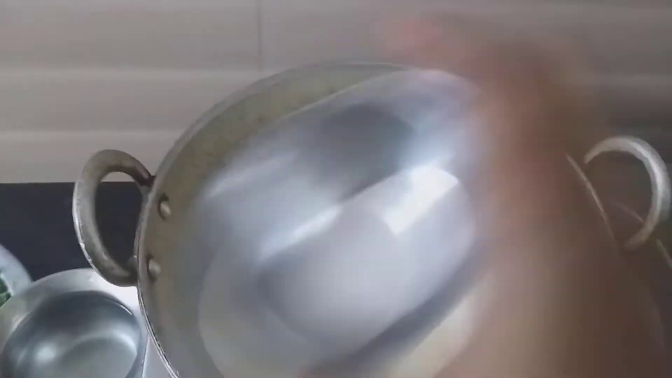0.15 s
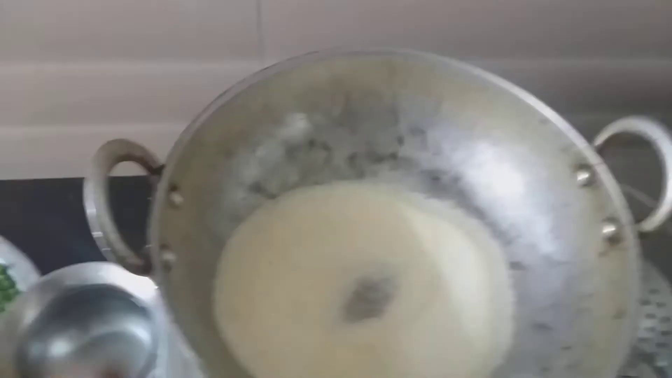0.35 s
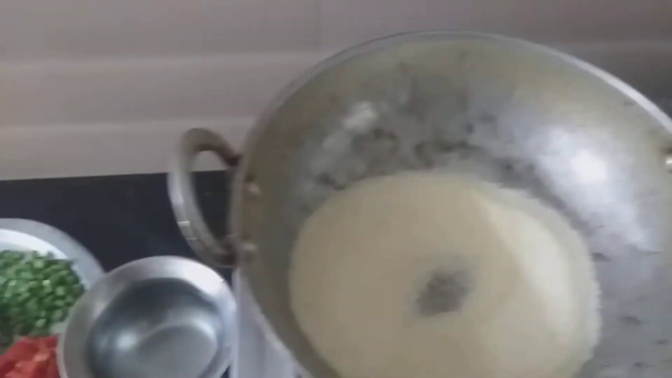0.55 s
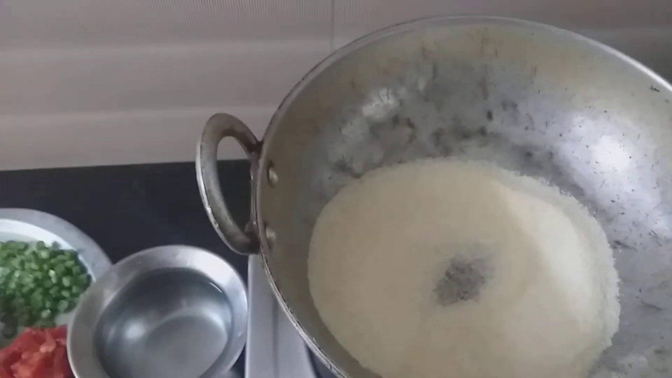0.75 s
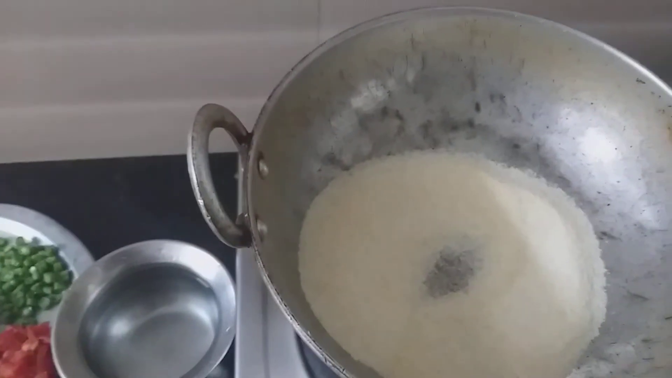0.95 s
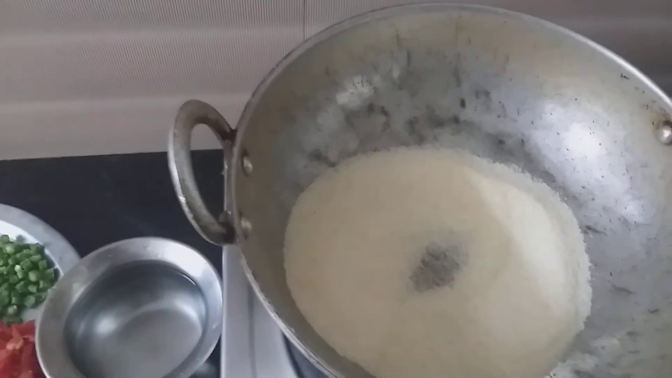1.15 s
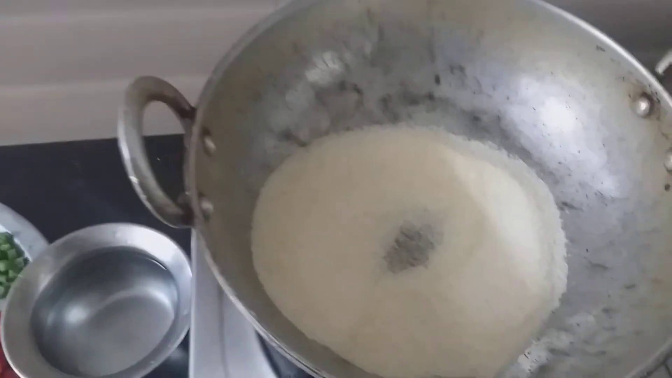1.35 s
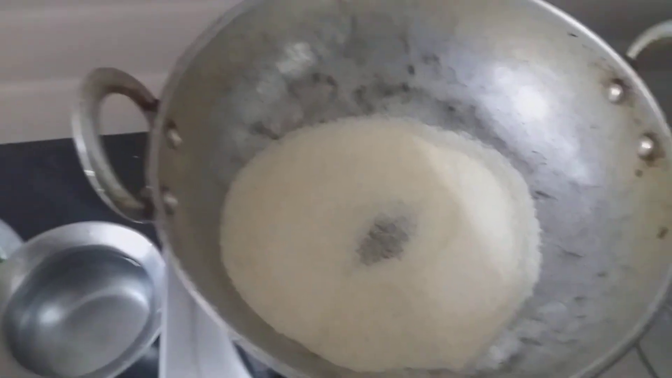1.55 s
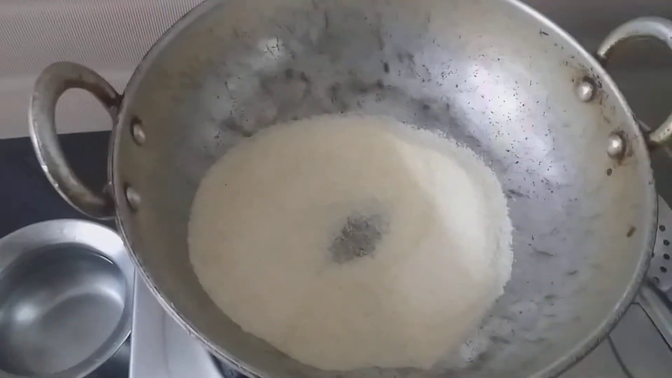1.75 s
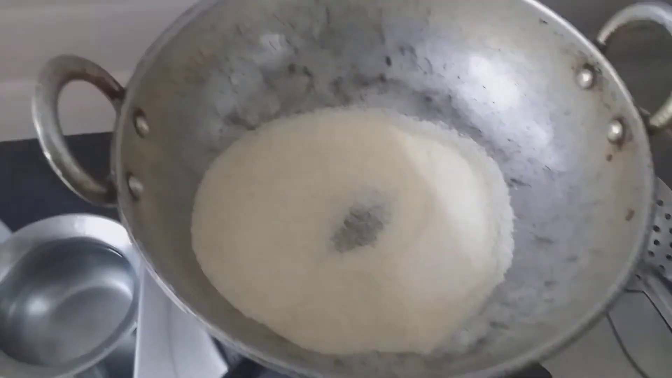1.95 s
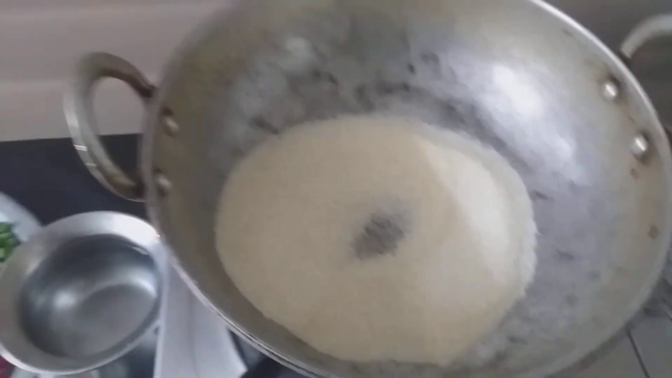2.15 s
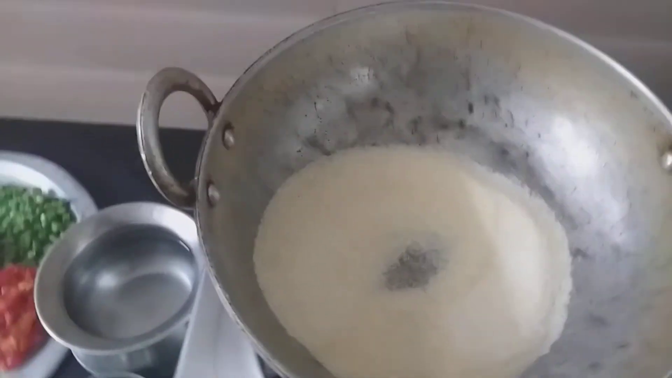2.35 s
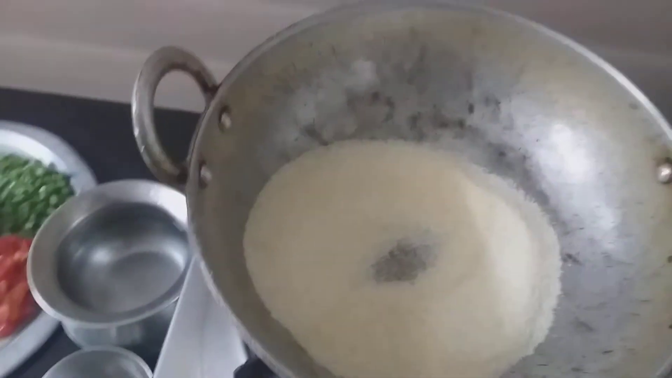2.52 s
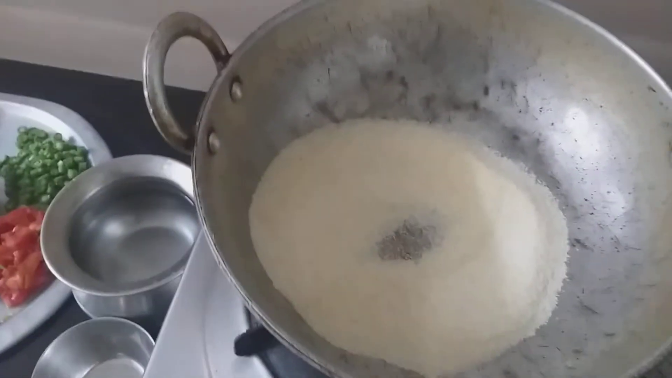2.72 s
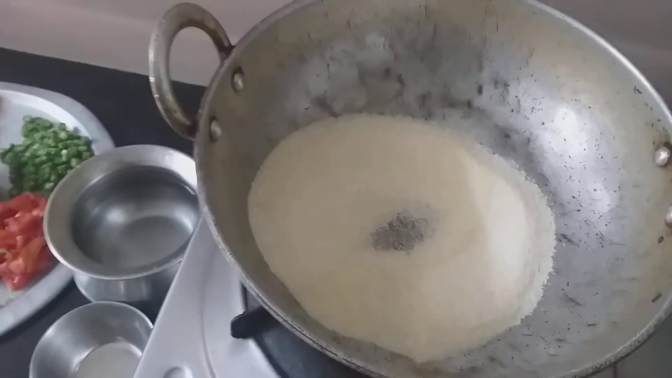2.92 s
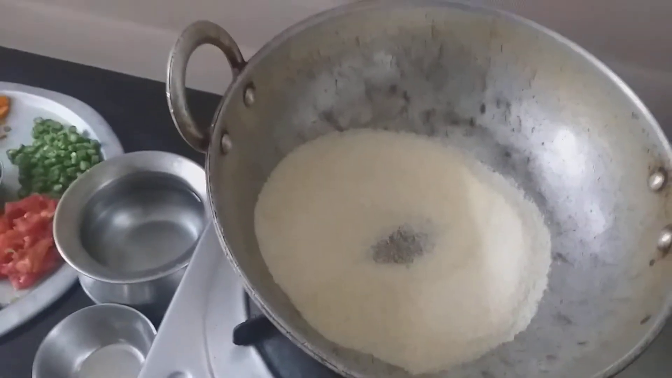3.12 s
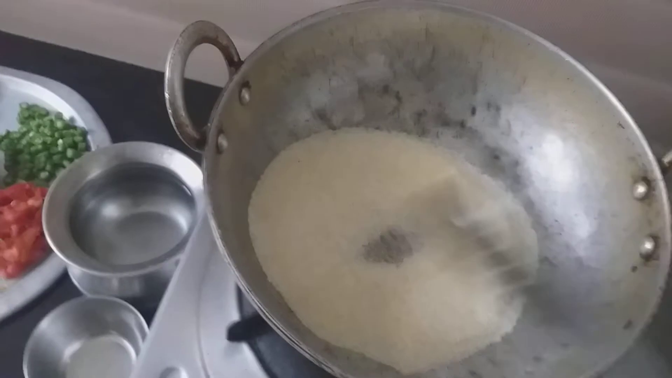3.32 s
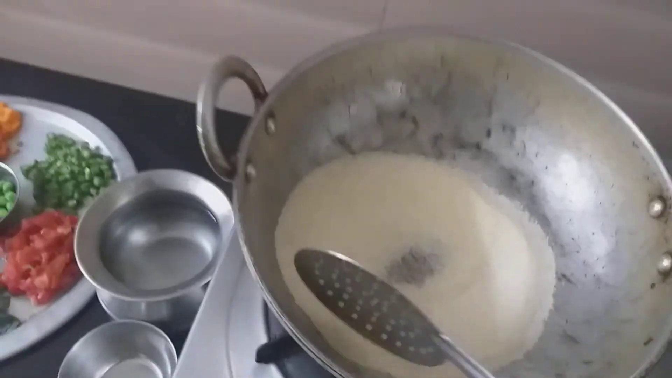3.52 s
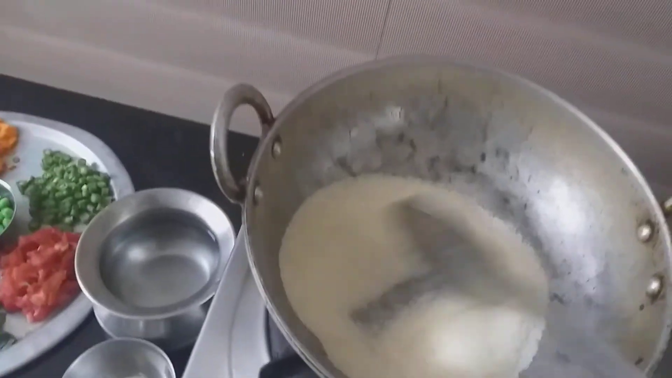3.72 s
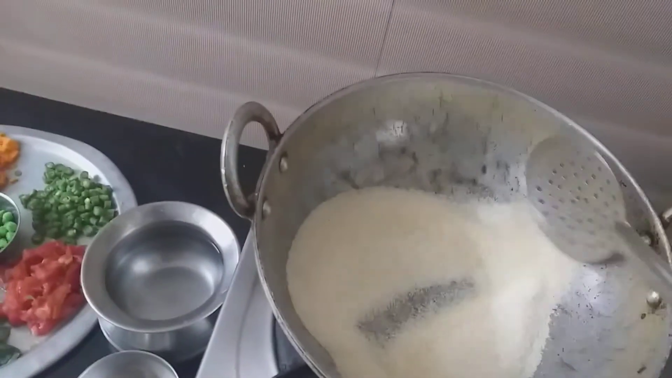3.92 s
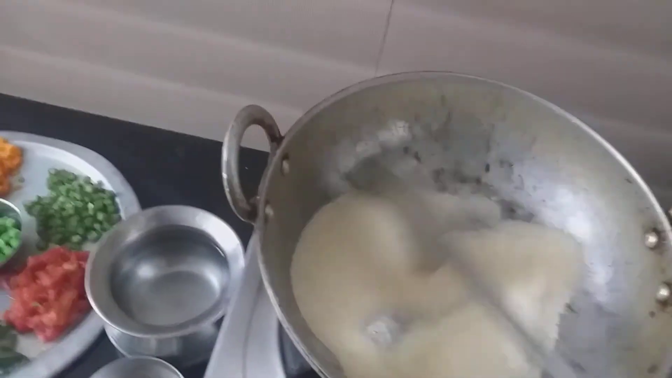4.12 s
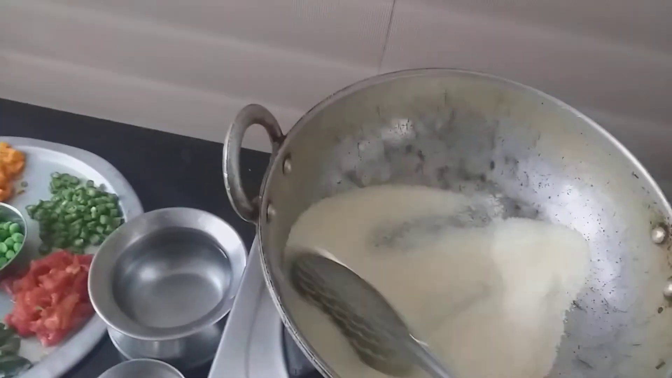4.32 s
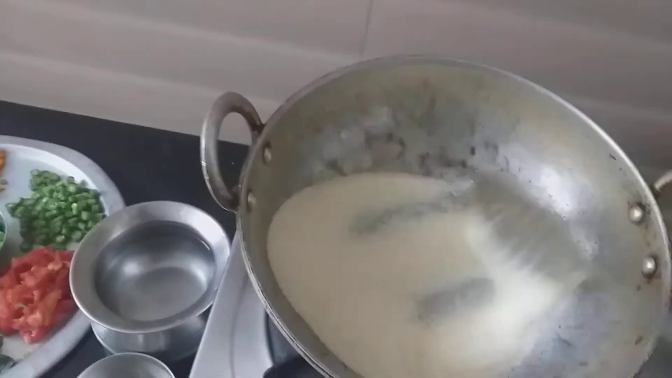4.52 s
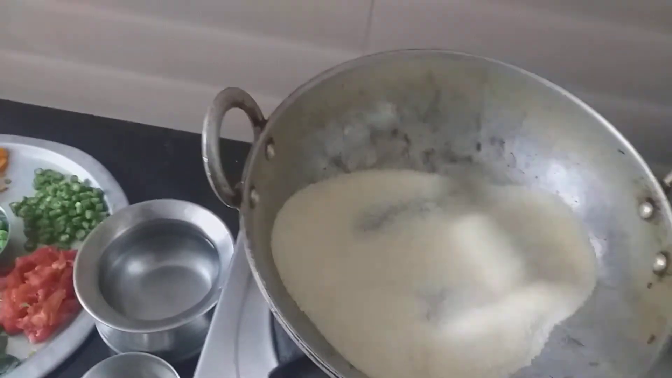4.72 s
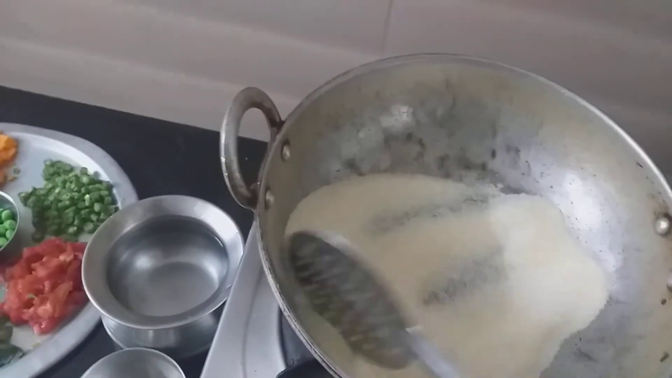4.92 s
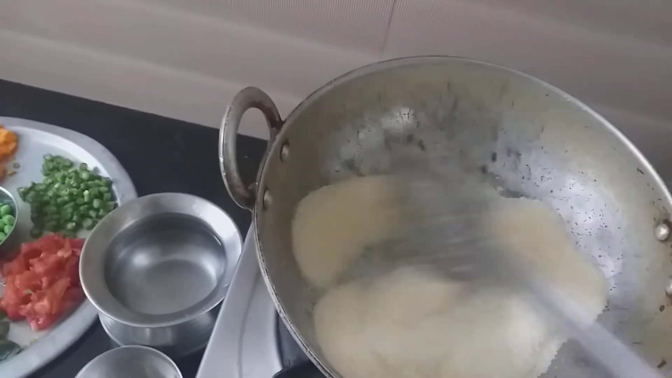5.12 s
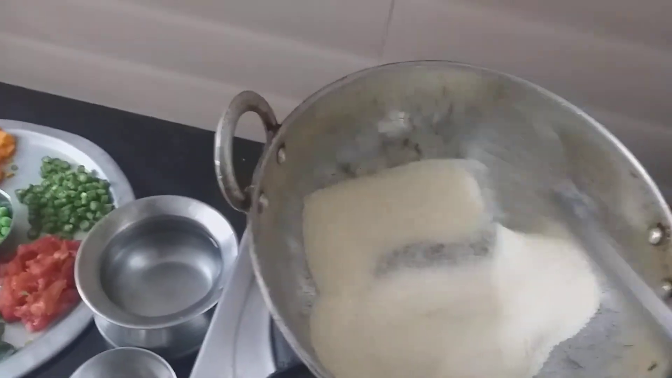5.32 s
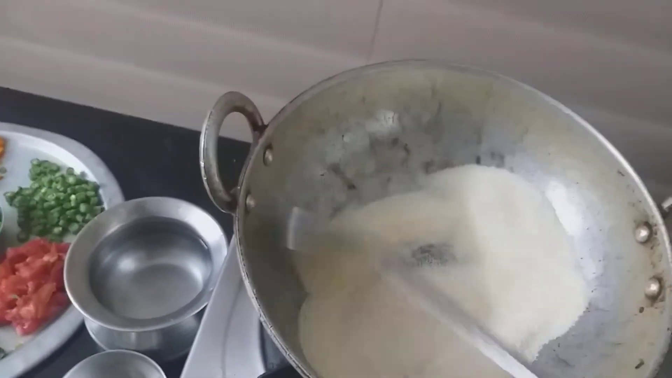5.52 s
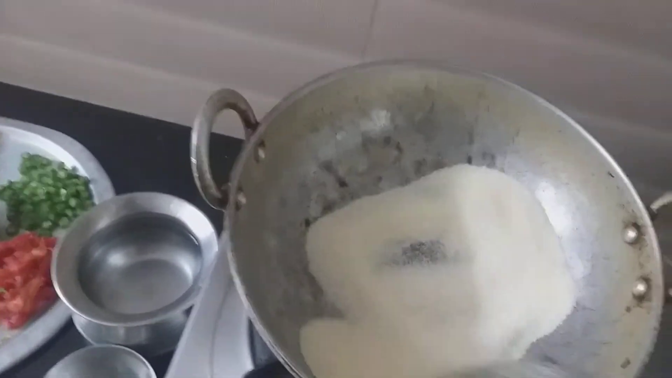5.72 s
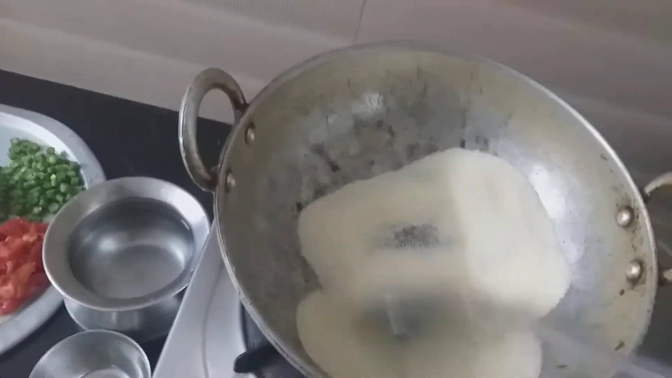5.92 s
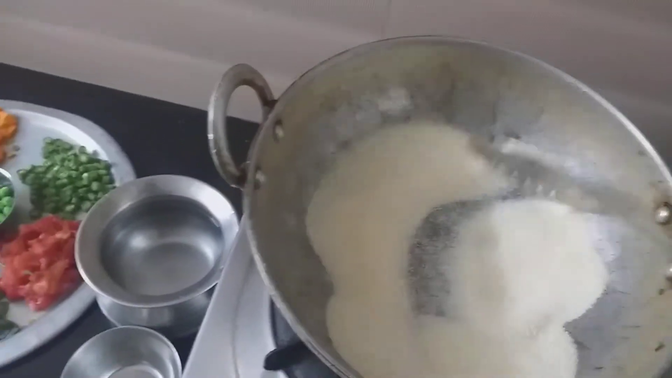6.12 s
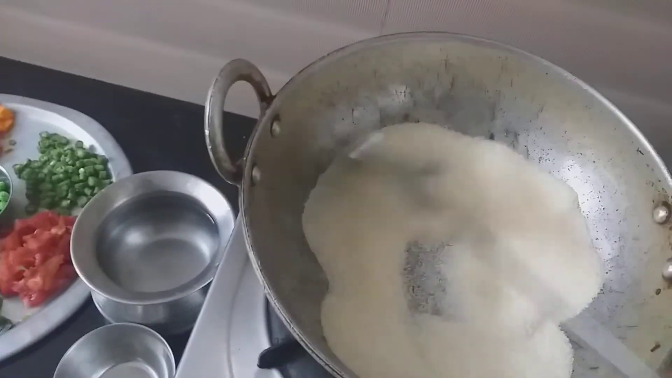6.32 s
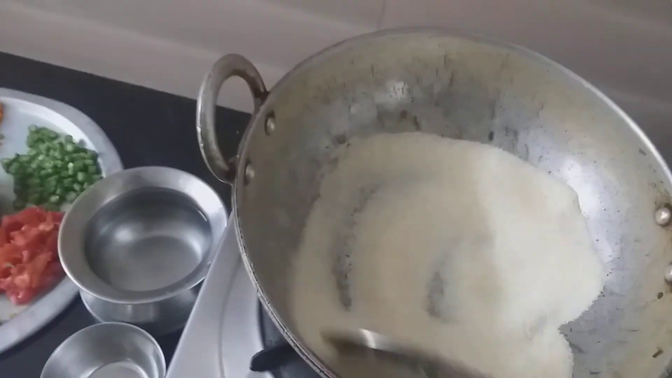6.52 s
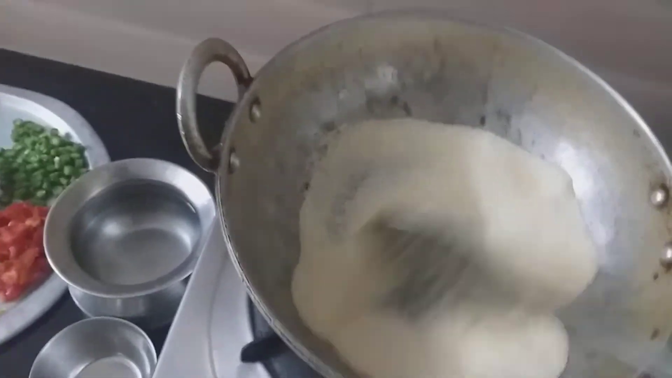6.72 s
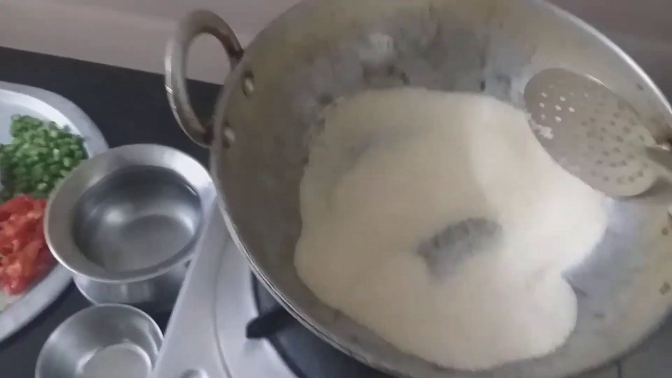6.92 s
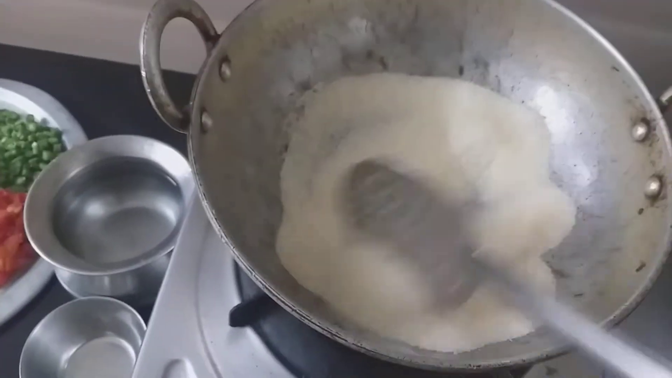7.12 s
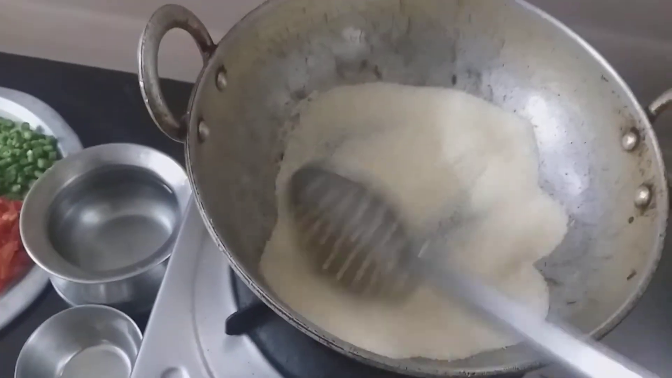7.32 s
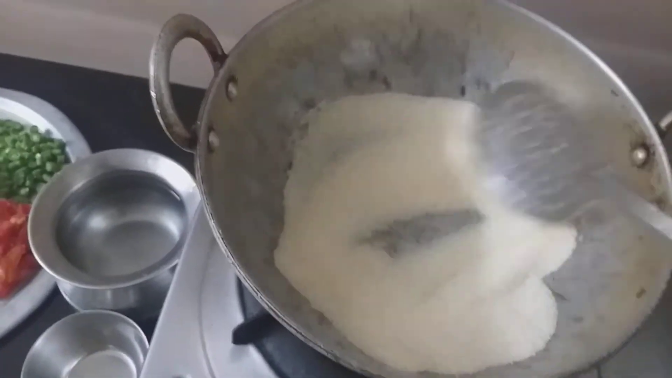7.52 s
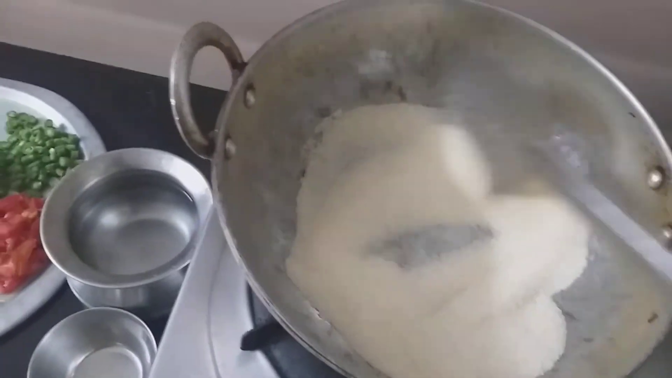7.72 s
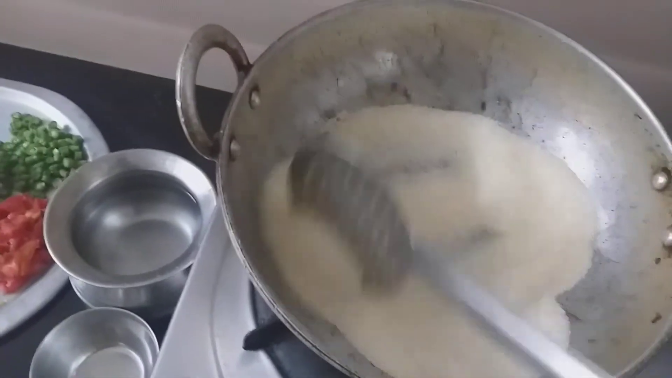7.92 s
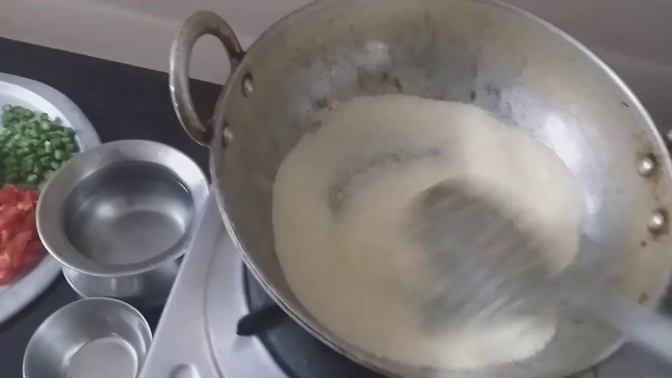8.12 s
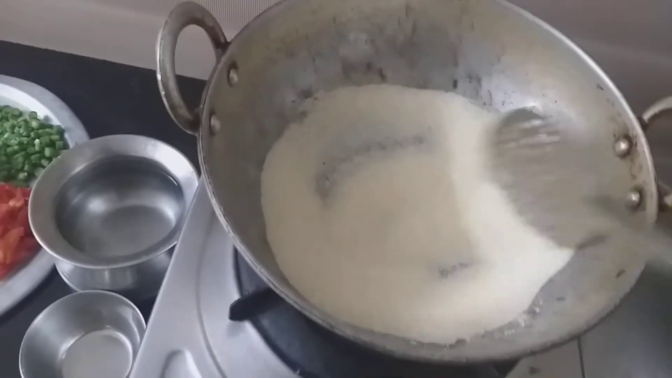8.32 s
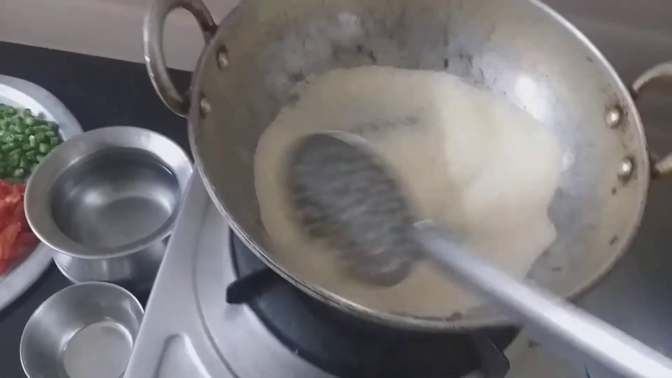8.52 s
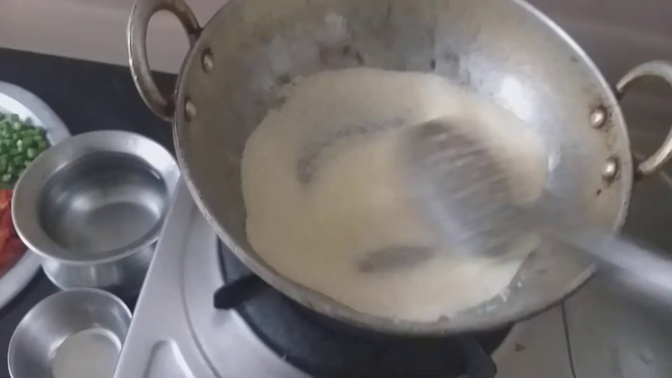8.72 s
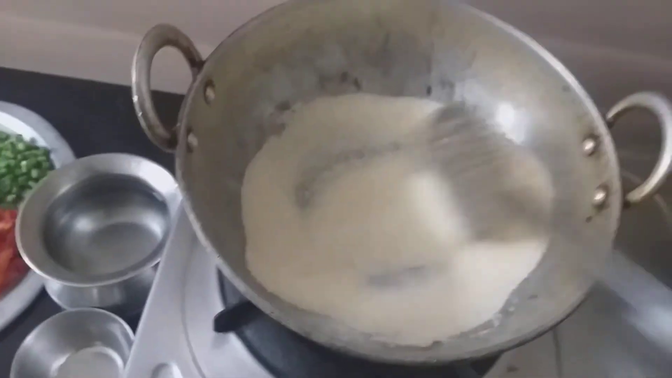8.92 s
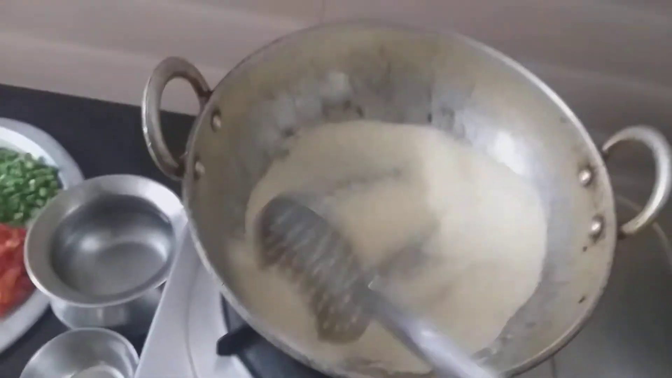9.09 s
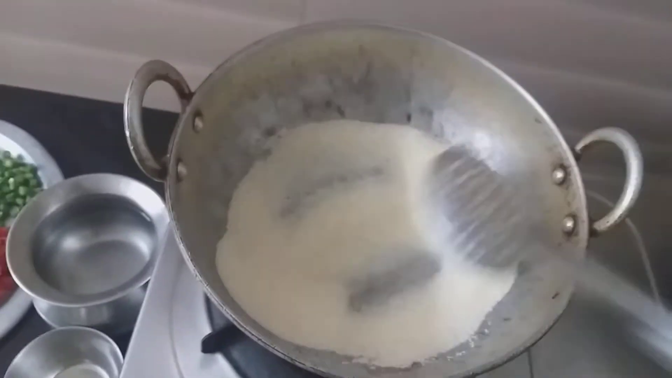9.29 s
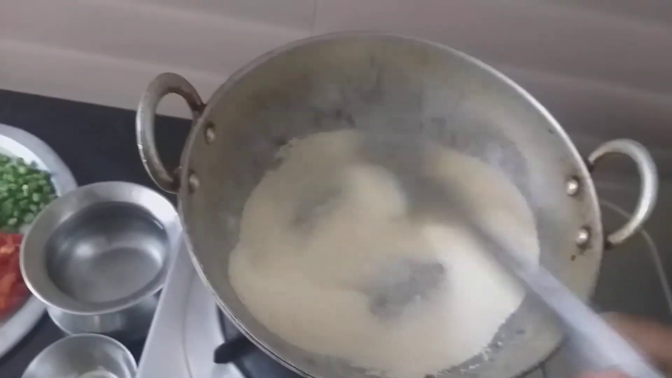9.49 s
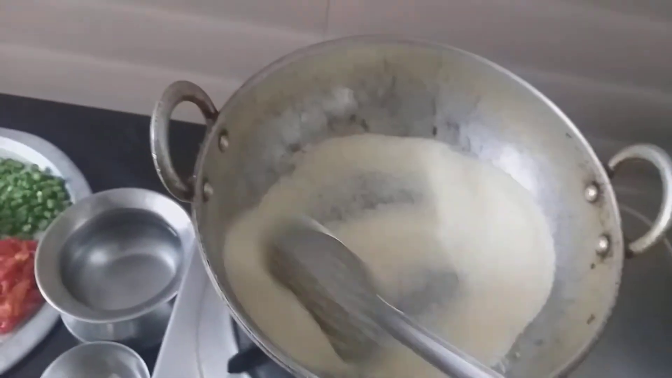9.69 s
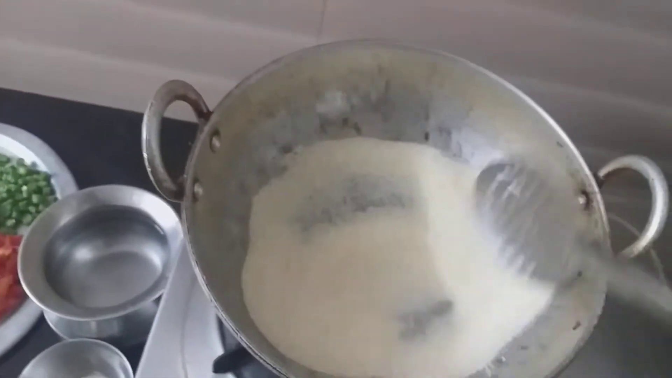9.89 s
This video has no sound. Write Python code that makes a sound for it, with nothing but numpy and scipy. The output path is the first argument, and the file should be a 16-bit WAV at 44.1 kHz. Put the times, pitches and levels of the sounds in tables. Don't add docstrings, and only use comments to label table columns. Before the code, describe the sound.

In a hard-walled kitchen a gas burner breathes low and steady. Steelware rattles lightly, and a small metal bowl lands with a bright clink and quick bounce. A spatula drags off the counter in a short stutter with a knock. Then it stirs dry semolina in a round metal pan, each quick stroke a tick, gritty hiss, crunch and dull pan hum. Close microphone, short room echo.

```python
import sys
import numpy as np
from scipy import signal
from scipy.fft import rfft, irfft, next_fast_len
from scipy.io import wavfile
from scipy.ndimage import uniform_filter1d

SR = 44100
rng = np.random.default_rng(int(sys.argv[2]) if len(sys.argv) > 2 else 0)


def magnitude_from_level(level_db):
    exponent = np.asarray(level_db, float) / 20
    return 10 ** exponent


def bounce(signal):
    frames = np.transpose(np.atleast_2d(signal))
    limited = np.clip(frames, -1, 1)
    pcm = np.round(limited * 32767).astype(np.int16)
    wavfile.write(sys.argv[1], SR, pcm)


N = 438794

# pitch_hz, level_db (per Hz)
FLAME = [(20, -35), (45, -25), (70, -8.5), (100, 3.5), (170, -2), (230, -11), (450, -4.5), (850, -6),
         (1350, -9), (1900, -9.5), (2600, -20.5), (5600, -32.5), (8200, -32.5), (11400, -30), (14000, -42)]
# pitch_hz, level_db (under the flame), t60_s
AIR_HOLLOWS = [(400, -17, .09), (620, -13.5, .12), (825, -13, .16), (1150, -17, .12), (1600, -21, .02),
               (950, -19, .12), (8130, -35, .004), (11200, -37, .006)]
# pitch_hz, level_db, t60_s
STAND = [(160.5, -1.5, 0.36), (101, -1, 0.17), (71, -13, 0.12)]
# pitch_hz, level_db, t60_s
COUNTER = [(588, 7, 0.44), (946, -6.5, 1), (1160, -7, 0.96), (163.5, 3, 0.55)]
# start_s, length_s, rumble_db, hiss_db
SLIPS = [
    (2.604, .01, -53, -46),
    (2.666, 0.022, -30.5, -70),
    (2.732, 0.016, -28.5, -46.5),
    (2.792, 0.019, -42.5, -61),
]
# start_s, peak_db, thud_db (over the peak), tilt_db (dull to bright)
RATTLES = [(0.1742, -29, -30, 9.5), (0.815, -53, -7, 6), (1.2331, -19.5, -15, 2), (1.328, -20, -16.5, 1),
           (1.4387, -29, -17, -4), (1.5364, -35, -17, -1), (1.7814, -47, -15, 5), (1.816, -41, 2, 8),
           (2.135, -51, 5, 10), (2.4079, -53, -24, 24), (2.6195, -23.5, -1, -10), (2.724, -33.5, 1, -18.5),
           (2.9811, -51, -18, 24), (3.0126, -66, -13, 12)]
# start_s, level_db
BOWL_HITS = [
    (1.6208, -14.5),
    (1.64966, -17),
    (1.697, -36),
    (1.735, -30),
]
# pitch_hz, level_db (per Hz)
BOWL_CRASH = [(150, -43), (450, -14), (800, -9.5), (1500, 2.5), (1950, 3.5), (2030, -2.5), (3700, -23),
              (9000, -31), (16000, -48.5)]
BOWL_HZ = [1350, 1519, 1593, 1636, 1786, 1830, 1917, 1974, 3720, 3766, 3745, 3776, 6035, 6087, 6104, 7048,
           8990, 9010, 10228, 12360, 12400, 13350, 13420, 14240, 15030]
# level_db, t60_s
BOWL_RING = [(-35, .3), (-20, 0.43), (7.5, 0.058), (-10, 0.2), (-4, .18), (-19, 0.13), (-22, 0.2),
             (2, 0.19), (-10.5, 0.36), (-12, 0.72), (-19, 0.77), (-13.5, 0.69), (-30, 0.34), (-10, 0.57),
             (-22, 0.39), (-13, 0.14), (-15, 0.22), (-12.5, 0.2), (-6, 0.11), (-26, 0.18), (-25, .22),
             (-21, .22), (-24, .22), (-28, 0.12), (-22, .1)]
# start_s, level_db
HANDLE_HITS = [
    (0.1745, -45),
    (2.137, -37),
    (2.172, -50),
    (2.408, -50),
    (2.727, -45),
    (3.0126, -43),
]
# pitch_hz, level_db, t60_s
HANDLE = [(8123, -7, .05), (7300, -3, .012), (8800, -3, .012), (7967, -5, .04), (11550, -6, .06),
          (13070, -8, .06), (6400, -18, .1), (9600, -12, .02)]
# pitch_hz, level_db, t60_s
HUM = [(276, 1, 0.3), (324, -5, 0.15), (345, -3, 0.16), (415.2, -13.5, 0.3)]
# pitch_hz, level_db, t60_s
WALL = [(487, 14.5, 0.015), (653, 5, 0.068), (750, 10, 0.036), (906, 13.5, 0.017), (1090, 2, 0.037),
        (1230, -11.5, 0.11)]
# pitch_hz, level_db, t60_s
CLANK = [(1520, -14, 0.014), (1700, -4, 0.014), (1800, -5, 0.04), (1870, -2.5, 0.065), (1980, -8, .012)]
# start_s, level_db
CLANK_HITS = [(2.619, -28.5), (2.724, -37), (3.9166, -25), (4.956, -17), (5.004, -28), (5.296, -25),
              (5.4644, -37), (5.511, -16), (5.537, -13), (5.777, -14), (6.277, -42), (6.5934, -23),
              (6.9352, -20.5), (8.065, -33), (8.5647, -33), (8.8174, -6), (9.0943, -26)]
# pitch_hz, level_db, t60_s
BLADE = [(3640, -5, 0.044), (6500, -3, 0.076), (8000, -18, 0.04), (8200, -34, 0.037), (12800, -7, .04)]
# start_s, peak_db, thud_db (over the peak), tilt_db (dull to bright)
TOUCHES = [(3.5769, -7, -13.5, 2.5), (3.9159, -6.5, -50, 3), (4.0073, -5, -20, 10), (4.2996, -15, -34, 6),
           (4.6336, -10.5, -12.5, 3), (4.9463, -3, -23, 6.5), (5.005, -19.5, 1, -14),
           (5.1836, -6.5, -27, 3), (5.2957, -9, -15, -6.5), (5.4122, -15, -17, 5), (5.7758, -5, -50, -5),
           (5.8275, -5, -43, 5), (6.0039, -13.5, -50, -14.5), (6.2404, -8.5, -33, 4), (6.2781, -15, -24, 4),
           (6.3145, -4, -10, -6), (6.5964, -33, -19, -14.5), (6.9347, -6.5, -17.5, 1), (7.212, -18, -13, 2),
           (7.3829, -9, -19, -6.5), (7.5692, -22.5, -41, 13), (7.662, -26, -9, -6), (7.8979, -19, -49, 1.5),
           (8.0617, -12, -16, 13), (8.3396, -18.5, -14, -2), (8.5648, -9, -10, -1),
           (8.8153, -5.5, -36, -11), (9.0936, -8, -16, 5), (9.3841, -15, -19, -9), (9.396, -6, -15, -7.5),
           (3.9295, -28, -19, 5), (4.055, -27, 1, -4), (5.478, -24.5, -3.5, 1), (5.512, -35, -8, -7),
           (5.538, -26, -17, -12), (6.27, -12, -7.5, -2), (6.2835, -21, -34, 5), (7.602, -29.5, -10, -10)]
# start_s, length_s, hiss_db (grain), hum_db (pan), wall_db (pan)
STROKES = [(3.581, 0.11, -42, -36.5, -43), (3.921, 0.14, -36, -38, -38.5), (4.306, 0.097, -37, -42, -41),
           (4.638, 0.062, -37.5, -37.5, -41.5), (4.956, 0.11, -34.5, -36.5, -35.5),
           (5.297, 0.2, -40, -41, -38.5), (5.471, 0.045, -31.5, -35, -32), (5.782, 0.18, -48, -41, -40.5),
           (5.976, 0.39, -40.5, -44, -45), (6.21, 0.18, -38, -48, -40.5), (6.596, 0.089, -37, -35.5, -38.5),
           (6.935, 0.064, -36.5, -36, -42.5), (7.207, 0.082, -54, -39.5, -43.5),
           (7.28, 0.12, -38, -45.5, -43.5), (7.601, 0.2, -52, -36.5, -44), (7.925, 0.06, -44.5, -40, -43.5),
           (8.057, 0.058, -39, -45, -50), (8.279, 0.047, -42.5, -48, -47.5),
           (8.564, 0.029, -41, -29.5, -36.5), (8.817, 0.074, -37, -36.5, -37),
           (9.091, 0.07, -44, -30.5, -44.5), (9.38, 0.16, -40, -36, -41.5), (9.573, 0.18, -46, -39.5, -49),
           (9.773, 0.033, -44, -59, -78)]
HUM_UPPER_DB = [-3, -4.5, 3.5, -7, 0.5, -2, -4, -1.5, -15, 0, -3, -2, 7.5, 1, -13, 0, -1, -2, -0.5, -3, -13,
                -0.5, -13, -3]
# full_s, hold_s, crunch_db, fine_db (hiss over the crunch)
HEAPS = [(3.675, 0.071, -36.5, -2.5), (4.046, 0.015, -25.5, -2), (4.426, 0.037, -36, 0.5),
         (4.69, 0.11, -39, -19), (5.075, 0.18, -33.5, 0), (5.378, 0.043, -54, 19), (5.513, 0.069, -39, 7),
         (5.757, 0.051, -59, 17.5), (5.888, 0.17, -33, -2), (6.268, 0.052, -36.5, 1),
         (6.714, 0.019, -31, -1.5), (7.001, 0.054, -34, -12), (7.37, 0.051, -38, -11),
         (7.69, 0.17, -34.5, 0.5), (7.908, 0.061, -50, 13), (8.096, 0.073, -47.5, -10),
         (8.349, 0.029, -37.5, -25), (8.645, 0.15, -43.5, 0), (8.84, 0.16, -36, -13),
         (9.197, 0.095, -41.5, 0.5), (9.449, 0.047, -26, -3), (9.578, 0.041, -43.5, 6),
         (9.786, 0.043, -46, 1.5)]
# pitch_hz, level_db (per Hz)
GRAIN = [(2200, -5), (2700, 2.5), (3300, 12), (4500, 4), (5300, 0.5), (6500, 4), (8500, 3), (10000, -10.5),
         (12300, -6), (16000, -17.5)]
# start_s, peak_db, centre_hz
SNAPS = [(3.929, -24, 8400), (4.0012, -20, 8200), (4.051, -35, 6500), (4.0603, -14, 3660),
         (4.4281, -22, 2920), (4.091, -29, 4550), (4.695, -20, 4200), (4.733, -21, 8000),
         (5.073, -21, 3730), (3.615, -27, 7260), (5.3816, -28, 6100), (5.502, -29, 7000),
         (5.8863, -20.5, 4700), (5.919, -16, 3280), (7.831, -28, 5200), (6.058, -18.5, 4170),
         (6.104, -25.5, 13100), (7.862, -37, 6500), (6.326, -15, 4150), (6.708, -27.5, 4270),
         (6.968, -18, 5750), (4.075, -24, 6940), (7.3984, -28.5, 7050), (7.409, -17, 6270),
         (7.7172, -23, 4130), (8.293, -27.5, 6500), (8.908, -19, 3700), (9.448, -17, 3300),
         (9.453, -19, 4250), (9.4871, -17.5, 6560)]
# start_s, peak_db, centre_hz
TICKS = [(3.7, -15.5, 3040), (3.717, -12.5, 2960), (4.0088, -22, 6440), (4.02, -14, 4230),
         (4.0853, -6.5, 4370), (4.1054, -27, 3170), (4.1126, -11, 3650), (4.3596, -13.5, 6540),
         (4.6743, -26, 4500), (4.7444, -29, 8260), (5.1126, -16, 8300), (5.1364, -18, 8060),
         (5.1418, -15, 7900), (5.1504, -14, 8630), (5.1542, -13, 6560), (5.2183, -12.5, 3310),
         (5.2508, -13, 3260), (5.2954, -34, 8160), (5.316, -15, 7300), (5.37, -16, 5510),
         (5.413, -12, 6200), (5.4193, -14, 6200), (5.4635, -16, 6550), (5.7763, -7, 8200),
         (5.825, -6, 5800), (5.8427, -14, 5510), (5.875, -27, 4030), (5.963, -12, 3020), (6.0042, -6, 6400),
         (6.2314, -28, 5600), (6.2778, -5, 5770), (6.284, -14, 7790), (6.301, -14, 4880),
         (6.3124, -1.5, 4160), (6.4087, -20, 4460), (6.6556, -14.5, 6460), (6.9349, -8.5, 7500),
         (6.987, -12.5, 5880), (7.2709, -29, 7860), (7.3846, -31, 2710), (7.602, -23, 7800),
         (7.66, -18, 6550), (7.7009, -20, 3850), (7.845, -14, 3920), (7.867, -11, 4490),
         (7.8986, -13.5, 6900), (7.9107, -15, 8490), (7.949, -17, 5810), (7.9618, -16.5, 7640),
         (8.0486, -26, 8480), (8.0603, -8.5, 6800), (8.3393, -14, 3420), (8.621, -23, 4680),
         (8.9376, -27, 3420), (9.1534, -20, 6900), (9.436, -20, 3270), (9.566, -29, 7000),
         (9.5881, -15, 6940), (9.6964, -21, 7150), (9.762, -23, 8620)]
# start_s, peak_db, pitch_hz
CHIPS = [(1.781, -52, 12500), (1.816, -41, 13000), (1.817, -48, 8200), (1.649, -31, 4430),
         (3.717, -39, 7350), (4.009, -22.5, 3950), (4.035, -33, 6140), (4.059, -25, 10370),
         (4.0918, -25.5, 3980), (4.3005, -31.5, 7400), (4.45, -27, 2790), (4.679, -31, 13900),
         (4.6947, -32, 9100), (4.732, -28, 2980), (5.005, -33, 6620), (5.183, -25, 3810),
         (5.608, -31.5, 13000), (5.874, -29, 3860), (5.932, -32, 5400), (6.117, -32, 13400),
         (6.255, -25, 5290), (6.325, -18, 3880), (6.345, -33, 3860), (6.706, -28, 3700), (6.968, -27, 9800),
         (6.98, -31, 12900), (7.408, -29, 2780), (7.57, -44, 11640), (7.727, -34, 10700),
         (7.744, -34, 8000), (7.751, -31, 6230), (7.776, -32, 7800), (7.785, -27.5, 4050),
         (7.831, -30, 3580), (7.867, -35, 12200), (7.914, -34, 8200), (8.07, -28, 4970),
         (8.339, -36, 13000), (9.095, -30, 6840), (9.385, -25, 4780), (9.403, -35, 12500),
         (9.437, -29, 3200), (9.503, -26, 3720), (9.508, -32, 13000), (9.656, -34, 12900),
         (9.745, -40, 4740)]
# pitch_hz, level_db
MIC = [(2000, -3.5), (2300, -7), (2900, -2.5), (8800, 4), (9250, -1.5), (10300, -2.5), (10900, 1.5),
       (15700, 4.5), (16000, -54), (17000, -42)]
# pitch_hz, width_hz, left_share
PORT_LEAN = [(1880, 420, .27), (9850, 600, -.25)]

CRACK_EDGES_HZ = np.geomspace(2400, 16500, 10)
EDGES_DB = -6.5
FLAME_DB = -55.5
# rise, sag, fall (dB per s)
HISS_SHAPE, HUM_SHAPE, WALL_SHAPE = (1300, 18, 83), (1600, 5.9, 146), (2300, 20, 120)
HEAP_SHAPE, SLIP_SHAPE, LIFT_SHAPE = (350, 35, 450), (730, 33, 450), (1500, 30, 900)
HUM_LAG_S = 0.014


def rms_one(x):
    return x / np.sqrt(np.mean(x ** 2) + 1e-20)


def at_hz(points, hz):
    point_hz, point_db = np.transpose(points)
    return np.interp(np.log(hz), np.log(point_hz), point_db)


def coloured(spectrum):
    size = next_fast_len(N)
    hz = np.fft.rfftfreq(size, 1 / SR) + 1
    return rms_one(irfft(rfft(rng.standard_normal(size)) * magnitude_from_level(at_hz(spectrum, hz)), size)[:N])


def drift(rate_hz):
    r = np.exp(-2 * np.pi * rate_hz * 40 / SR)
    slow = signal.lfilter([1], [1, -2 * r, r * r], rng.standard_normal(N // 40 + 2002))[2000:]
    return np.interp(np.arange(N) / 40, np.arange(len(slow)), rms_one(slow))


def band(x, low_hz, high_hz):
    return signal.sosfilt(signal.butter(2, [low_hz, high_hz], "band", fs=SR, output="sos"), x)


def above(x, hz, order=4):
    return signal.sosfilt(signal.butter(order, hz, "high", fs=SR, output="sos"), x)


def ring(x, hz, t60):
    r, w = magnitude_from_level(-60 / (t60 * SR)), 2 * np.pi * hz / SR
    return signal.lfilter([0, np.sin(w)], [1, -2 * r * np.cos(w), r * r], x + 1e-18)


def clicks(seconds, db):
    out = np.zeros(N)
    out[np.round(np.asarray(seconds) * SR).astype(int)] = magnitude_from_level(db)
    return out


def burst(seconds, db, t60, rise_s=0.0017):
    swell, fall = np.exp(-1 / (rise_s * SR)), magnitude_from_level(-60 / (t60 * SR))
    return signal.lfilter([1 - swell], [1, -swell - fall, swell * fall], clicks(seconds, db) + 1e-18)


def pressed(start_s, length_s, db, shape):
    rise, sag, fall = shape
    late = np.arange(0, N + 64, 64) / SR - np.asarray(start_s)[:, None]
    held = np.asarray(length_s)[:, None]
    each_db = np.asarray(db)[:, None] + rise * np.minimum(late, 0)
    each_db = each_db - sag * np.clip(late, 0, held) - fall * np.maximum(late - held, 0)
    total_db = 10 * np.log10(np.sum(magnitude_from_level(2 * each_db), axis=0) + 1e-15)
    return np.interp(np.arange(N) / 64, np.arange(len(total_db)), total_db)


def struck(seconds, db, modes, uneven_db):
    chance = rng.standard_normal((len(seconds), len(modes)))
    out = 0
    for k, (hz, level_db, t60) in enumerate(modes):
        out = out + ring(clicks(seconds, db + level_db + uneven_db * chance[:, k]), hz, t60)
    return out


def knocked(seconds, db, modes, push_t60):
    push = rng.standard_normal(N) * burst(seconds, db, push_t60)
    return sum(magnitude_from_level(level_db) * ring(push, hz, t60) for hz, level_db, t60 in modes)


def rubbed(modes, rough_db):
    push = rng.standard_normal(N) * magnitude_from_level(rough_db * drift(37))
    return rms_one(sum(magnitude_from_level(db) * ring(push, hz, t60) * (-1) ** k for k, (hz, db, t60) in enumerate(modes)))


def evened(x, share):
    return rms_one(x / (uniform_filter1d(x ** 2, size=1400) + 0.022) ** (share / 2))


def bright_bands():
    white = rng.standard_normal((2, N))
    return [rms_one(band(white[k % 2], *CRACK_EDGES_HZ[k:k + 2])) for k in range(9)]


def contacts(rows, bright, crack_t60, rise_s, tail_t60, tail_db, push_t60, thud_gain_db):
    s, peak_db, thud_db, tilt_db = np.transpose(rows)
    dull_db, middle_db, bright_db = EDGES_DB - tilt_db, 0 * s - 2.5, EDGES_DB + tilt_db
    colour_db = np.array([dull_db] * 3 + [middle_db] * 4 + [bright_db, bright_db - 5.5])
    db = peak_db + colour_db + 0.39 * rng.standard_normal((len(s), 9)).T
    crack = 0
    for noise, d in zip(bright, db):
        crack = crack + noise * (burst(s, d - 5, crack_t60, rise_s) + burst(s, d + tail_db, tail_t60))
    thud = knocked(s, peak_db + thud_db + thud_gain_db, HUM + WALL, push_t60)
    return crack + above(band(thud, 83, 1600), 277)


def flame():
    return magnitude_from_level(FLAME_DB + 0.48 * drift(19)) * coloured(FLAME)


def room_air():
    white = rng.standard_normal(N)
    whistle = magnitude_from_level(pressed([0.55], [0.15], [-74], HEAP_SHAPE)) * rms_one(ring(white, 3400, 0.033))
    air = 0
    for hz, db, t60 in AIR_HOLLOWS:
        air = air + magnitude_from_level(FLAME_DB + db + 4.5 * drift(2.1)) * rms_one(ring(white, hz, t60))
    return whistle + air


def stand():
    s, length, _, hum_db, _ = np.transpose(STROKES)
    rubbing = magnitude_from_level(pressed(s + HUM_LAG_S, length, hum_db, HUM_SHAPE) - 20.5) * rubbed(STAND, rough_db=-3.5)
    shift = above(knocked([6.19], -73, STAND, push_t60=0.94), 74)
    answer = above(knocked([1.64], -80, HUM[:1], push_t60=1.2), 200)
    return rubbing + shift + answer


def steelware(bright):
    s, db = np.transpose(BOWL_HITS)
    modes = [(hz, *rest) for hz, rest in zip(BOWL_HZ, BOWL_RING)]
    bowl = 0
    for k in range(3):
        bowl = bowl + struck(s, db - 5, modes[k::3], uneven_db=1.0) * magnitude_from_level(4.5 * drift(35) - 2.5)
    crash = coloured(BOWL_CRASH) * (burst(s, db - 7.5, 0.15, rise_s=0.0004) + burst(s, db - 24, 0.75))
    shimmer = sum(bright) * burst(s[:1], -68.5, 3.3)
    touched, touch_db = np.transpose(HANDLE_HITS)
    handle = knocked(touched, touch_db - 21, HANDLE, push_t60=0.02)
    rattles = contacts(RATTLES, bright, 0.01, 0.018, 0.29, tail_db=-35.5, push_t60=0.46, thud_gain_db=-45.0)
    return band(bowl, 1100, 17000) + crash + shimmer + handle + rattles


def drag():
    friction = rng.standard_normal(N) * magnitude_from_level(2.3 * drift(80))
    edges_hz = [(230, 760), (900, 2270), (2600, 8000), (4300, 5400)]
    s, length, rumble_db, hiss_db = np.transpose(SLIPS)
    levels = [pressed(s, length, db, SLIP_SHAPE) for db in (rumble_db, rumble_db - 8.5, hiss_db)]
    levels.append(pressed([2.588], [0.035], [-48], LIFT_SHAPE))
    return sum(magnitude_from_level(db) * rms_one(band(friction, *e)) for db, e in zip(levels, edges_hz))


def counter_knock():
    return knocked([2.726], -62, COUNTER, push_t60=0.06)


def chips():
    out, t = np.zeros(N + SR), np.arange(SR // 20) / SR
    shape = (1 - np.exp(-t / 0.001)) * magnitude_from_level(-60 * t / 0.018)
    chance = rng.standard_normal((len(CHIPS), 2, 4, 1))
    for (s, db, hz), (off, turn) in zip(CHIPS, chance):
        tones = np.sin(2 * np.pi * ((hz + 280 * off) * t + turn)).sum(axis=0)
        out[int(s * SR):][:len(t)] += magnitude_from_level(db + 2.0) * shape * tones
    return out[:N]


def snaps(bright, grain_db):
    when, pitch, size = rng.random((220, 3)).T
    stray_s = when * (N - 1) / SR
    stray_db = grain_db[(stray_s * SR).astype(int)] - 5 - 3.5 * np.log(size + 0.056)
    stray = [stray_s, stray_db, 3200 * 3.0 ** pitch]
    ticks = np.transpose(TICKS) + [[0], [-11], [0]]
    s, peak_db, hz = np.hstack([np.transpose(SNAPS), ticks, stray])
    octaves_off = np.abs(np.log2(CRACK_EDGES_HZ[:-1, None] * 1.116 / hz))
    uneven = np.clip([b[(s * SR / 2).astype(int)] for b in bright], -2, 1.5)
    db = peak_db + 0.5 - 11 * octaves_off + 2.2 * uneven
    return sum(b * burst(s, d, 0.0071, rise_s=0.0013) for b, d in zip(bright, db))


def clanks():
    s, db = np.transpose(CLANK_HITS)
    return band(struck(s, db - 15.5, CLANK, uneven_db=6.0), 1090, 2460)


def pan_body():
    s, length, _, hum_db, wall_db = np.transpose(STROKES)
    upper_db = pressed(s + HUM_LAG_S, length, hum_db + HUM_UPPER_DB, HUM_SHAPE)
    hum_db = pressed(s + HUM_LAG_S, length, hum_db, HUM_SHAPE)
    wall_db = pressed(s, length, wall_db, WALL_SHAPE)
    between = magnitude_from_level(wall_db - 9.5) * rms_one(band(rng.standard_normal(N), 570, 2340))
    low = magnitude_from_level(hum_db - 4.5) * evened(rubbed(HUM[:1], rough_db=-0.5), share=0.7)
    upper = magnitude_from_level(upper_db - 4.5) * above(rubbed(HUM[1:], rough_db=5.0), 262)
    wall = magnitude_from_level(wall_db - 2.0) * rubbed(WALL, rough_db=3.0)
    return between + low + upper + wall


def grains(low_hz, high_hz, per_s, count, patchy_db):
    sizes = magnitude_from_level(2.94 * np.minimum(rng.exponential(1, N), 5)) * rng.choice([-1, 1], N)
    born = sizes * (rng.random(N) < per_s / SR) * magnitude_from_level(2.5 * drift(45))
    dealt, out = rng.integers(0, count, N), 0
    for k, hz in enumerate(np.geomspace(low_hz, high_hz, count)):
        level = magnitude_from_level(at_hz(GRAIN, hz) + patchy_db * drift(23.0)) * hz
        out = out + level * ring(born * (dealt == k), hz, 28 / hz)
    return rms_one(out)


def stirring(bright):
    s, length, hiss_db, _, _ = np.transpose(STROKES)
    full_s, hold_s, crunch_db, fine_db = np.transpose(HEAPS)
    coarse_db = pressed(full_s, hold_s, crunch_db, HEAP_SHAPE)
    fine_db = pressed(full_s, hold_s, crunch_db + fine_db, HEAP_SHAPE)
    stroke_db = pressed(s, length, hiss_db, HISS_SHAPE)
    hiss_db = 10 * np.log10(magnitude_from_level(2 * stroke_db) + magnitude_from_level(2 * fine_db))
    dust_db = -47.5 + 0.59 * (hiss_db + 39.0) + np.minimum(hiss_db + 61, 0)
    hiss = magnitude_from_level(hiss_db - 7) * grains(4390, 10000, 8000, count=9, patchy_db=4.0)
    crunch = magnitude_from_level(coarse_db - 5) * grains(2290, 4310, 4000, count=8, patchy_db=3.5)
    dust = magnitude_from_level(dust_db) * grains(9270, 16500, 11000, count=6, patchy_db=3.0)
    singing = magnitude_from_level(hiss_db - 18 + 4 * drift(7.4)) * rubbed(BLADE, rough_db=5.0)
    blows = contacts(TOUCHES, bright, 0.0041, 0.0045, 0.046, tail_db=-52.5, push_t60=0.019, thud_gain_db=-33.0)
    return hiss + crunch + dust + pan_body() + singing + blows + clanks() + snaps(bright, coarse_db)


def kitchen(x):
    t = np.arange(SR // 2) / SR
    tail = rng.standard_normal(len(t)) * magnitude_from_level(-60 * t / 0.42) * (t > 0.006)
    return signal.fftconvolve(x, magnitude_from_level(-7) * above(tail, 350) / np.linalg.norm(tail))[:N]


def scene():
    bright = bright_bands()
    near = steelware(bright) + drag() + counter_knock() + chips() + stirring(bright)
    near = above(near + kitchen(near), 130, order=3)
    return np.tile(flame() + room_air() + stand() + near, (2, 1))


def roll_off(x):
    return signal.sosfilt(signal.butter(12, 16980, fs=SR, output="sos"), x)


def record(dry):
    size = next_fast_len(N)
    hz = np.fft.rfftfreq(size, 1 / SR) + 1
    mid = rfft(dry[0], size) * magnitude_from_level(at_hz(MIC, hz))
    lean = 0
    for top, width, share in PORT_LEAN:
        off = (hz - top) / width
        lean = lean + share / (1 + 2j * off) / (1 + (off / 1.6) ** 6)
    mix = irfft(mid * (1 + lean * [[1], [-1]]), size)[:, :N]
    return roll_off(mix)


dry = scene()
out = record(dry)
bounce(out)
```